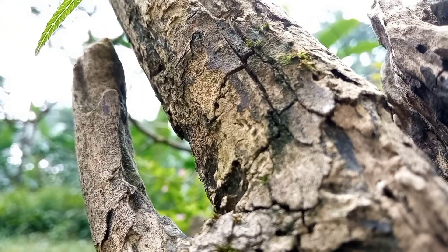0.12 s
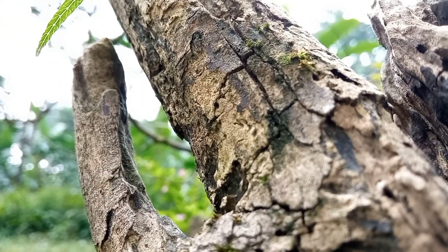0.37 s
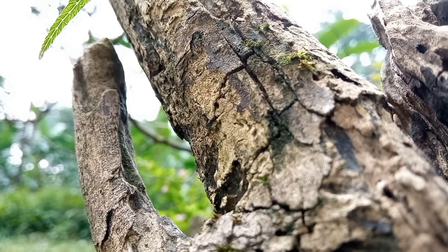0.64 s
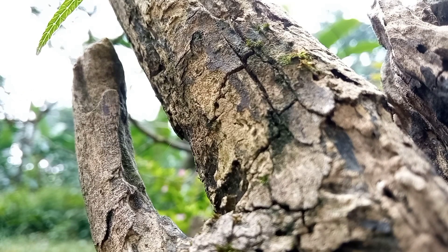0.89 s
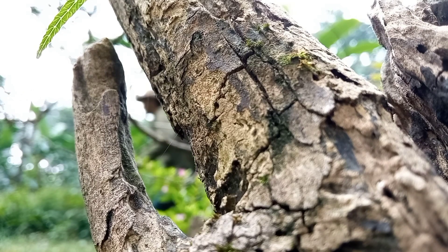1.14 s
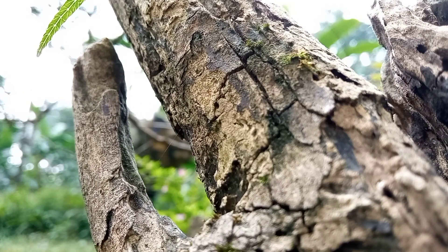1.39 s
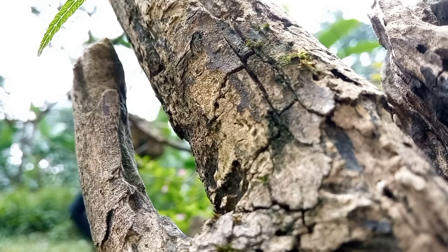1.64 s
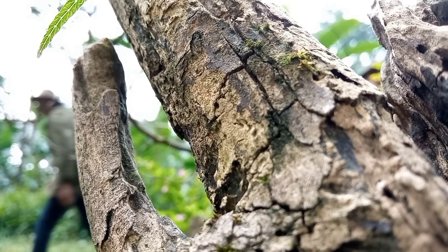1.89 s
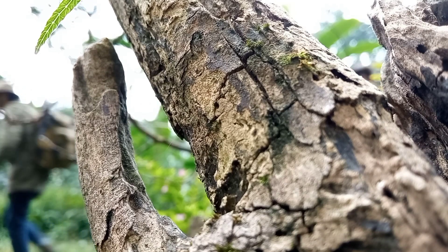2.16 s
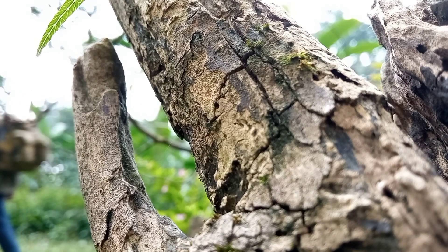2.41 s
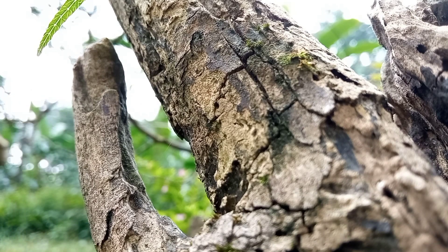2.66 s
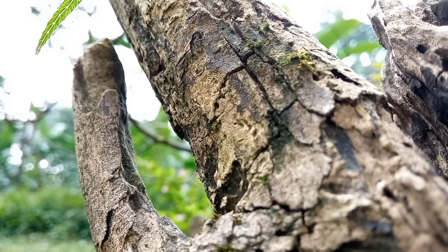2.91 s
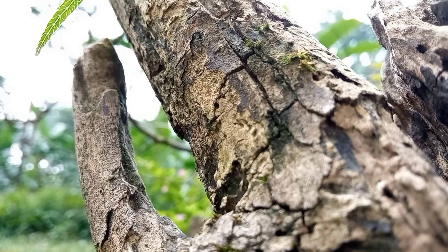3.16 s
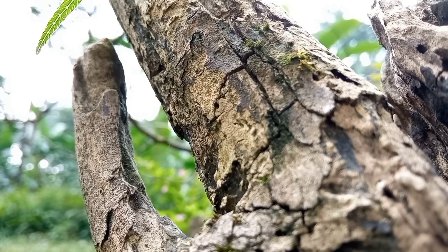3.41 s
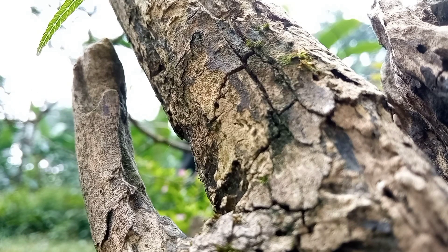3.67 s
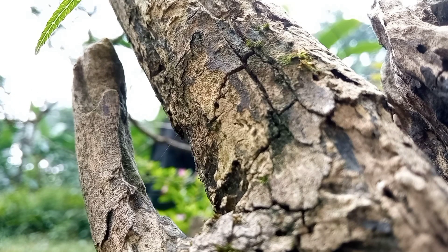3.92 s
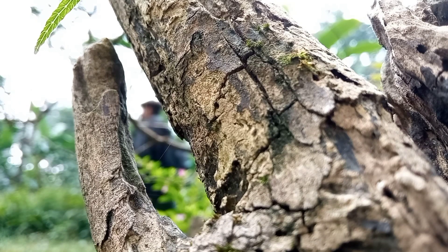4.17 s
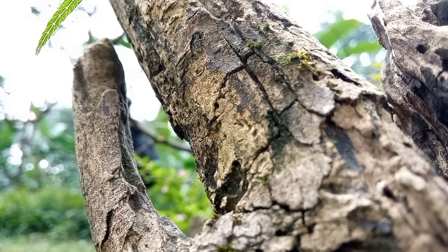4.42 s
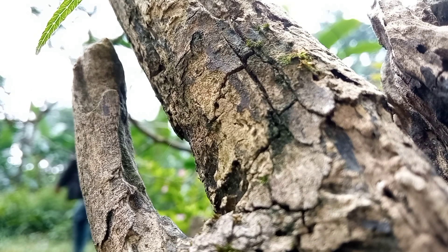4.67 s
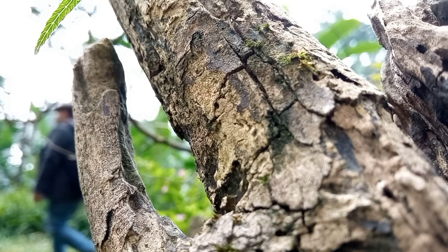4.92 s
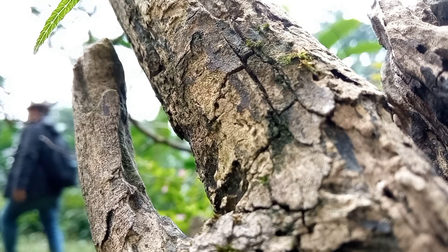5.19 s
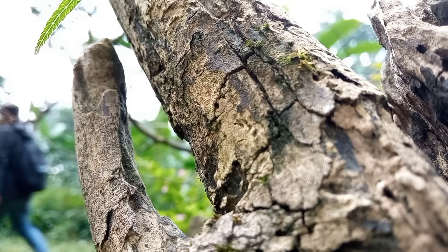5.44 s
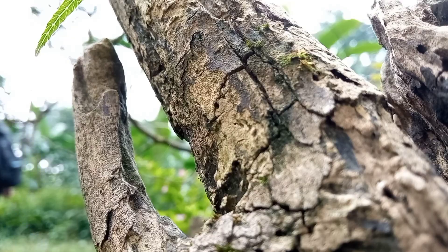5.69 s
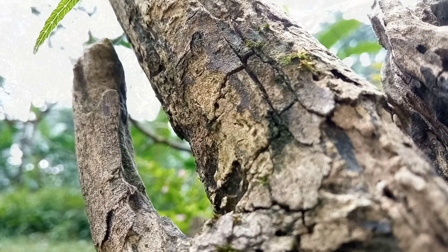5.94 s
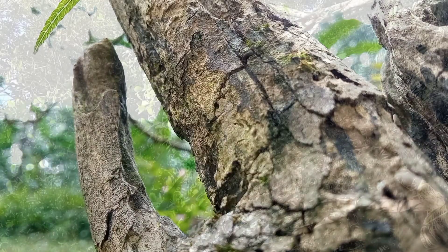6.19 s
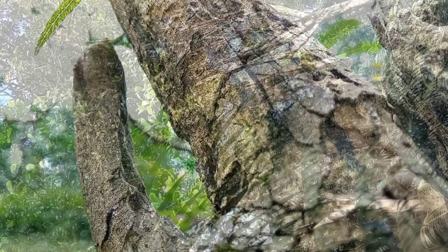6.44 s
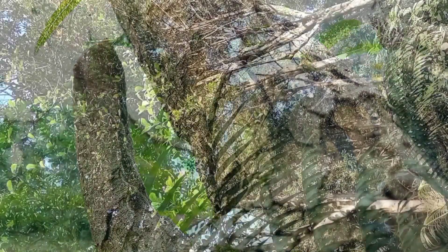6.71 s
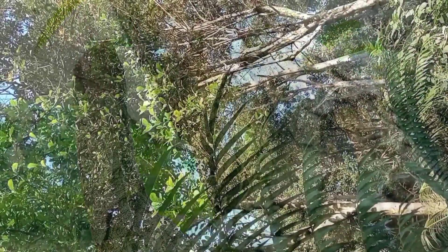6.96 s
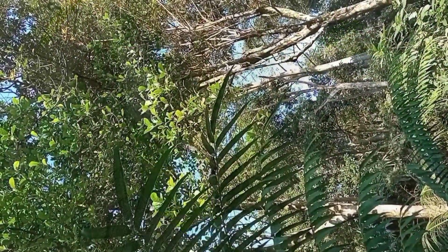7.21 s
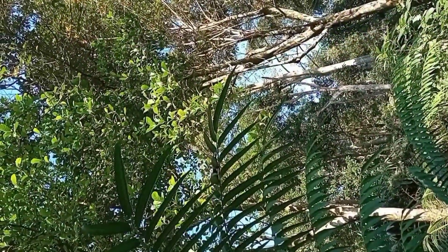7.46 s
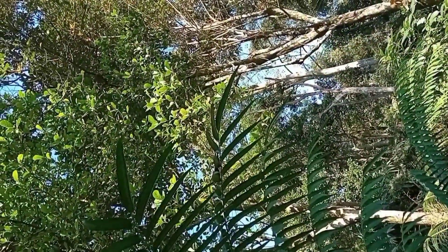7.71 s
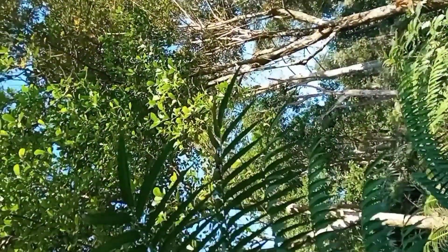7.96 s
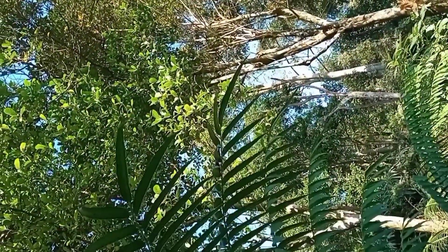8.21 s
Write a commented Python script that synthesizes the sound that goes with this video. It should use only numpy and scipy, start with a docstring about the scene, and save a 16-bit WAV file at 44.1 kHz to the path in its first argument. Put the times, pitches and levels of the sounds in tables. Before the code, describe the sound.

Shrill, throbbing cicadas fill a forest while footsteps swish through grass; a second, slightly lower cicada chorus joins, with reversed-sounding bird trills and hoarse calls.

```python
"""Two forest places, the second joining at 6.6 s and the first stopping at 7.4 s, over a lumpy low rumble.
The first: throbbing cicada click trains, steps as bursts of snaps in grass, far birds and a long hoot as
wavering tones, hollow knocks as decaying modes, and a close leafy branch as dense crackles.
The second, played backwards: lower cicadas, a trill whose echoes swell ahead of it, a hoarse caller made of
noise shifted up to a moving pitch, and a pop as a reversed decay. Both channels carry the same sound."""
import sys
import numpy as np
from scipy import signal
from scipy.fft import rfft, irfft, next_fast_len
from scipy.io import wavfile
from scipy.ndimage import uniform_filter1d

SR = 44100
rng = np.random.default_rng(int(sys.argv[2]) if len(sys.argv) > 2 else 0)


def to_wav(sig):
    """Store sig (one row per channel, or 1-D mono) as 16-bit WAV at the path in sys.argv[1].

    Samples outside -1..1 are clipped; the rate is SR.
    """
    pcm = np.clip(np.atleast_2d(sig), -1, 1) * 32767
    pcm = np.round(pcm).astype(np.int16)
    wavfile.write(sys.argv[1], SR, pcm.T)  # frames by channels


def makeup_ratio(level_db):
    """Linear amplitude ratio for a level in decibels (20 dB per factor of ten)."""
    decades = np.asarray(level_db, float) / 20
    return 10 ** decades


N = 367774  # length [samples]
FIRST_ENDS, SECOND_STARTS = 7.383, 6.628  # [s]


def evened(x):
    """Normalisation: scales a signal to rms 1."""
    return x / np.sqrt(np.mean(x ** 2) + 1e-20)


def read(points, hz):
    """Interpolation of a spectrum along a logarithmic frequency axis."""
    f, value = np.transpose(points)
    return np.interp(np.log(hz + 1), np.log(f + 1), value)


def curve(rows, order=1):
    """Linear interpolation of one table column at every sample."""
    rows = np.asarray(rows)
    return np.interp(np.arange(N) / SR, rows[:, 0], rows[:, order])


def add(mix, s, sound):
    """Superposition: sums a sound into the mix from time s."""
    part = mix[round(s * SR):][:len(sound)]
    part += sound[:len(part)]


def coloured(x, points, tilt_db=0):
    """Linear filtering by a spectrum, tilted about 900 Hz by tilt_db per octave."""
    size = next_fast_len(len(x))
    hz = np.fft.rfftfreq(size, 1 / SR)
    gain_db = read(points, hz) + tilt_db * np.log2((hz + 50) / 900)
    return irfft(rfft(x, size) * makeup_ratio(gain_db), size)[:len(x)]


def drift(top_hz):
    """Random-phase synthesis: twenty slow sines sum to a wandering curve of rms 1."""
    t = np.arange(0, N, 64) / SR
    slow = 0
    for f in np.geomspace(top_hz / 20, top_hz, 20):
        slow = slow + np.sin(2 * np.pi * (f * t + rng.random())) / np.sqrt(f)
    return np.interp(np.arange(N), np.arange(len(t)) * 64, evened(slow))


def echoes(t60):
    """Diffuse scattering among trunks: exponentially decaying noise of energy 1."""
    t = np.arange(round(.8 * SR)) / SR
    tail = rng.standard_normal(len(t)) * makeup_ratio(-60 * t / t60)
    return tail / np.linalg.norm(tail)


def note(db, hz, length):
    """Amplitude modulation: a soft sine, arched 1.9 % in pitch, flutters on its way through moving leaves."""
    u = np.arange(round(length * SR)) / (length * SR)
    slow = evened(uniform_filter1d(rng.standard_normal(len(u)), size=200))
    flutter = evened(1 + .5 * slow)
    pitch = hz * (1 + 0.019 * np.sin(np.pi * u))
    return makeup_ratio(db) * flutter * np.sin(np.pi * u) * np.sin(2 * np.pi * np.cumsum(pitch) / SR)


# Spectrum of each cicada chorus as heard, with gaps near 12-14 kHz:
# (frequency [Hz], relative level per hertz [dB])
FIRST_CHORUS = [(2060, -47.5), (3500, -39.5), (4440, -24), (4910, -10), (5130, -2.5), (5560, -5), (6030, 2),
                (6340, -5.5), (6960, -17.5), (8300, -30.5), (11100, -25), (11800, -26), (12400, -35),
                (13200, -39), (13700, -45), (15100, -27), (15600, -33)]
SECOND_CHORUS = [(2060, -46), (3500, -29), (3840, -27), (4700, -5.5), (5160, -6.5), (5590, -2), (6070, -13),
                 (7090, -29.5), (7790, -31.5), (8350, -29.5), (9820, -25), (12500, -49), (13700, -36),
                 (14900, -24), (15300, -19), (15600, -23)]
# Effort of each chorus, about which its level wanders: (time [s], level [dB])
FIRST_EFFORT = [(0.0, -27), (0.5, -27.5), (4.6, -28.5), (6.0, -27.5), (6.5, -28.5), (7.4, -28.5)]
SECOND_EFFORT = [(6.63, -31.5), (7.4, -32.5), (7.8, -31.5), (8.34, -32.5)]
# Bands of the three kinds of insect: (low edge [Hz], top edge [Hz])
INSECT_BANDS = [(100, 7800), (7800, 13200), (13200, 17000)]


def cicadas(spectrum, effort, click_hz, throb_hz, depths, wet, count=20):
    """Filtered impulse trains: buckling drums click in throbbing trains, scattered by leaves."""
    chorus = 0
    wet = np.clip(wet, 0, 1)  # share of power that is scattered
    hz = np.fft.rfftfreq(N, 1 / SR)
    for (low_hz, top_hz), depth in zip(INSECT_BANDS, depths):
        kind = np.zeros(N)
        for size_db, pace, throb, start in rng.standard_normal((count, 4)):
            beats = np.arange(2500) + .1 * rng.standard_normal(2500)  # jittered
            at = (abs(beats) * SR / (click_hz * (1 + .06 * pace))).astype(int)
            at = at[at < N]
            throb_phase = 2 * np.pi * throb_hz * (1 + .06 * throb) * at / SR + 3 * start
            pulse = 1 + depth * np.sin(throb_phase)
            clicks = np.zeros(N)
            clicks[at] = makeup_ratio(0.58 * size_db) * pulse * rng.standard_normal(len(at))
            scattered = signal.oaconvolve(clicks, echoes(t60=0.085)[:2500])[:N]
            kind += np.sqrt(1 - wet) * clicks + np.sqrt(wet) * scattered
        chorus = chorus + rfft(evened(kind)) * (hz >= low_hz) * (hz < top_hz)
    level = makeup_ratio(curve(effort) + 0.21 * drift(top_hz=8))
    return level * evened(coloured(irfft(chorus, N), spectrum))


# Background hiss and rumble of each place as heard, the second with a gap near 2.7 kHz:
# (frequency [Hz], relative level per hertz [dB])
FIRST_BACKGROUND = [(15, -49.5), (25, -44), (42, -14), (86, 0), (118, 2.5), (376, -14.5), (538, -15),
                    (854, -13.5), (1480, -23), (2340, -16.5), (3020, -22.5), (3570, -24), (3800, -24),
                    (4940, -33), (8360, -120)]
SECOND_BACKGROUND = [(15, -56), (25, -35), (70, 3), (156, -7.5), (247, -10), (393, -11.5), (561, -11.5),
                     (2250, -12), (2550, -15), (2750, -22), (2950, -17.5), (3800, -24), (4940, -47.5),
                     (8360, -120)]
# Uneven rise and fall of the bass, with some sudden jumps, before chance lumps are added:
# (time [s], relative level [dB])
BASS_LEVEL = [(0, 0.5), (1.95, -3.5), (2.05, 2.5), (2.7, 1.5), (3.1, 2.5), (3.9, 1), (4.9, 0.5),
              (5.45, -5.5), (5.55, 4), (6.1, -3), (6.8, 4.5), (7.05, -3), (7.4, 4), (8.0, -3), (8.34, 5.5)]


def background(points, db, patchy_db):
    """Random short-time spectra: hiss in drifting patches over a bass that rises and falls unevenly."""
    lump_db, lump_hz = 2, 50  # rms and fastest rate of the chance lumps
    frames, hz = N // 256 + 5, np.fft.rfftfreq(1024, 1 / SR)
    a, b, patches = rng.standard_normal((frames, 513, 3)).T
    patches = uniform_filter1d(patches, size=8, axis=0)
    patches = evened(uniform_filter1d(patches, size=14, axis=1))
    bass_db = curve(BASS_LEVEL) + lump_db * drift(lump_hz)
    bass_db = bass_db[np.minimum(np.arange(frames) * 256, N - 1)]
    bass = 1 / (1 + (hz[:, None] / 220) ** 4)  # share of the bass level at each frequency
    spectra = (a + 1j * b) * makeup_ratio(patchy_db * (1 - 0.48 * bass) * patches + bass * bass_db)
    sound = signal.istft(spectra, nperseg=1024, noverlap=768)[1][:N]
    return makeup_ratio(db) * evened(coloured(sound, points))


# Clearest short calls, before the echo blend: (time [s], level [dB], base pitch [Hz], length [s])
BIRD_CALLS = [(0.117, -50, 786, 0.054), (0.26, -51, 801, 0.087), (0.366, -48, 892, 0.039),
              (0.507, -47, 883, 0.032), (0.619, -49, 887, 0.046), (1.1987, -53, 2590, 0.042),
              (1.38, -46, 886, 0.067), (1.469, -54, 843, 0.046), (2.19, -57, 1780, 0.18),
              (2.6, -51, 678, 0.078), (2.6354, -50, 2590, 0.0445), (2.73, -56, 713, 0.13),
              (2.825, -51, 2680, 0.0324), (2.9596, -48, 2995, 0.04), (3.163, -50, 2440, 0.0345),
              (3.469, -49, 900, 0.054), (3.6855, -54, 2590, 0.045), (3.8277, -50, 2580, 0.035),
              (4.449, -52.5, 1138, 0.093), (4.675, -49, 1095, 0.061), (5.189, -48.5, 900, 0.07),
              (5.32, -55, 1740, 0.036), (5.363, -52, 2564, 0.0335), (5.488, -51, 2870, 0.04),
              (5.54, -49, 1730, 0.06), (5.658, -51, 2540, 0.026), (5.832, -53, 2260, 0.028),
              (6.079, -47, 922, 0.051)]
# The long hoot, before the echo blend: (start [s], length [s], mean level [dB], top of the pitch arch [Hz])
LONG_HOOT = (1.92, 0.65, -53, 709)


def far_birds(count=24):
    """Reverberant blurring of distant tones: calls, faint chance chirps and one long wavering hoot."""
    out = np.zeros(N)
    for s, *call in BIRD_CALLS:
        add(out, s, note(*call))
    for when, (size, pitch) in zip(rng.random(count), rng.standard_normal((count, 2))):
        add(out, when * FIRST_ENDS, note(db=-57.5 + 2.7 * size, hz=2420 + 148 * pitch, length=0.039))
    s, length, db, top_hz = LONG_HOOT
    rise_s, fall_s, arch_hz = 0.076, .03, 22
    t = np.arange(0, length, 1 / SR)
    shape = np.minimum(t / rise_s, 1) ** 2 * np.minimum((length - t) / fall_s, 1)
    hz = top_hz - arch_hz * (2 * t / length - 1) ** 2 + 5 * drift(top_hz=39.8)[:len(t)]
    level = np.sqrt(2) * makeup_ratio(db + 3.7 * drift(top_hz=160)[:len(t)])
    add(out, s, level * shape * np.sin(2 * np.pi * np.cumsum(hz) / SR))
    return 0.65 * out + 0.5 * signal.oaconvolve(out, echoes(t60=0.51))[:N]


# Dull knocks on something hollow close by: (time [s], strength [dB])
BLOWS = [(0.299, -35.5), (3.242, -34), (7.242, -30.5), (7.296, -25.5), (7.304, -25), (7.315, -25),
         (7.324, -29.5), (7.337, -25.5), (7.351, -31)]
# Modes of the hollow thing: (frequency [Hz], relative level [dB], time to decay by 60 dB [s])
HOLLOW_MODES = [(132, -1.5, 0.065), (247, -2.5, 0.074), (324, -3, 0.0625), (472.5, -15.5, 0.21)]


def knocks():
    """Modal decay: each blow rings the damped modes of a hollow body."""
    out, t = np.zeros(N), np.arange(9000) / SR
    for s, db in BLOWS:
        for hz, mode_db, t60 in HOLLOW_MODES:
            level = makeup_ratio(db + mode_db - 60 * t / t60)
            onset = 1 - np.exp(-t / 0.009)
            add(out, s, level * onset * np.sin(2 * np.pi * hz * t))
    return out


# Steps in grass: (time [s], strength [dB], brightness [dB per octave])
FOOTFALLS = [(0.598, -47.5, 2), (0.996, -41.5, -0.5), (1.298, -47, 5), (1.545, -40.5, 0.8),
             (1.933, -40, -0.5), (2.402, -41.5, 4.5), (2.473, -34, 2), (2.768, -49, 0), (3.037, -35, -0.5),
             (3.232, -38.5, -2), (3.618, -37, -0.5), (3.794, -45, 3), (4.236, -38, 2), (4.79, -36.5, 2.5),
             (5.337, -39.5, 3.5), (5.538, -37, 1.5), (5.95, -39.5, 2), (6.107, -41.5, 5),
             (6.658, -37.5, 0.8), (7.271, -33.5, 2)]
# Colour of the grass: (frequency [Hz], relative level per hertz [dB])
GRASS_COLOUR = [(150, -14), (400, -2), (900, -0.3), (1600, -12), (3000, -14), (7000, -8.5), (15000, -40)]
# Twigs: (time [s], level [dB], base pitch [Hz], length [s])
TWIGS = [(4.964, -47, 1600, .008), (5.996, -43, 1110, 0.0089)]


def steps():
    """Impulsive noise: blades and twigs snap in a clumped swish under each foot."""
    swish_s, lead_s = 0.077, .012  # time scale of a swish; it starts just before the foot lands
    out, t = np.zeros(N), np.arange(round(.35 * SR)) / SR
    for s, db, tilt_db in FOOTFALLS:
        snap_db = 2.8 * np.minimum(rng.exponential(1, len(t)), 5)
        snaps = evened(rng.standard_normal(len(t)) * makeup_ratio(snap_db))
        clumps = evened(uniform_filter1d(rng.standard_normal(len(t)), size=350))
        snaps *= makeup_ratio(2.1 * clumps)
        u = t / swish_s
        swish = 3 * u * np.exp(-1.4 * u ** 2)
        add(out, s - lead_s, makeup_ratio(db) * coloured(snaps, GRASS_COLOUR, np.clip(tilt_db, -4, 5)) * swish)
    for s, *tick in TWIGS:
        add(out, s, note(*tick))
    return out


# The pop: (time of its sharp end [s], strength [dB], frequency [Hz])
REVERSED_POP = (6.7372, -20, 980)


def pop():
    """Time reversal of a damped oscillation: a hollow click swells for a few cycles and stops."""
    out, t = np.zeros(N), np.arange(600) / SR
    s, db, hz = REVERSED_POP
    envelope = 1.76 * (1 - np.exp(-t / 0.00069)) * np.exp(-t / 0.0017)
    ring = makeup_ratio(db) * envelope * np.sin(2 * np.pi * hz * t)
    add(out, s - len(t) / SR, ring[::-1])
    return out


# Two-syllable calls: (time of the sharp end [s], relative level [dB])
CALLS = [(7.04, -3), (7.69, 1.5), (8.31, 0.5)]
# Low then high syllable: (peak time from the sharp end [s], pitch [Hz], level [dB], swell [dB/s], fade [dB/s])
CALL_SYLLABLES = [(-.23, 3000, -51.5, 30, 110), (-.03, 3222, -51, 70, 500)]


def hoarse_caller():
    """Quadrature modulation: noise shifted to a fuzzy band near 3 kHz, a low then a high syllable."""
    slide_s = .07  # pitch slide between syllables
    low_at, low_hz = CALL_SYLLABLES[0][:2]
    high_hz = CALL_SYLLABLES[1][1]
    t, level, hz = np.arange(N) / SR, np.zeros(N), np.full(N, float(low_hz))
    for end, call_db in CALLS:
        for before, _, db, swell_db, fade_db in CALL_SYLLABLES:
            late = t - end - before
            shape_db = np.minimum(swell_db * late, -fade_db * late)
            level = np.maximum(level, makeup_ratio(call_db + db + shape_db))
        high = np.clip((t - end - low_at) / slide_s - 1, 0, 1) * (t < end + .03)
        hz = hz + high * (high_hz - low_hz)
    fuzz = signal.lfilter(*signal.butter(3, 100, fs=SR), rng.standard_normal((2, N)))
    turn = 2 * np.pi * np.cumsum(hz) / SR
    shifted = evened(fuzz[0] * np.cos(turn) + fuzz[1] * np.sin(turn))
    return level * makeup_ratio(1.8 * drift(top_hz=79.9)) * shifted


# Trill phrases, before the echo blend: (time [s], level [dB])
TRILL_PHRASES = [(7.101, -33), (7.772, -33), (8.444, -33)]
# Notes of a phrase: (time after the phrase mark [s], lowest pitch [Hz])
TRILL_NOTES = [(.001, 1728), (0.06, 1546), (.15, 1500), (.213, 1447)]
# Course of one note: (time [s], share of the climb to the top pitch [0-1], relative level [dB])
TRILL_SHAPE = [(-.012, 0.104, -11), (-.004, 0.016, -5.5), (.006, 0.248, 1), (0.012, .8, 0),
               (0.018, .93, -4), (.025, 0.975, -9), (0.031, 1.0, -15)]


def trilling_bird():
    """Time-reversed reverberation: notes dwell low and whip up, the forest echo coming ahead of them."""
    top_hz = 2435
    out = np.zeros(N + SR)
    s, climb, shape_db = np.transpose(TRILL_SHAPE)
    t = np.arange(s[0], s[-1], 1 / SR)
    for mark, phrase_db in TRILL_PHRASES:
        for after, low_hz in TRILL_NOTES:
            pitch = low_hz + (top_hz - low_hz) * np.interp(t, s, climb)
            level = makeup_ratio(phrase_db + np.interp(t, s, shape_db)) * signal.windows.tukey(len(t), .2)
            add(out, mark + after + s[0], level * np.sin(2 * np.pi * np.cumsum(pitch) / SR))
    paths = makeup_ratio(-0.3) * echoes(t60=0.8) + makeup_ratio(-6.5) * echoes(t60=0.098)  # far trunks and near branches
    paths[round(.009 * SR)] += .4  # one strong bounce
    echoed = signal.oaconvolve(out[::-1], paths)[:len(out)][::-1]
    return (makeup_ratio(-4.0) * out + echoed)[:N]


# A leafy branch brushing past close by: (time [s], level [dB], length [s])
BRANCH = (7.2, -36, 0.08)
# Colour of its leaves: (frequency [Hz], relative level per hertz [dB])
LEAF_COLOUR = [(200, -5), (700, -10), (1200, -1.5), (3000, -6), (8000, -5), (12000, -11.5), (15500, -18)]


def brush():
    """Friction noise: many small leaf contacts make a short bright swish of dense crackles."""
    out = np.zeros(N)
    s, db, length = BRANCH
    u = np.arange(round(length * SR)) / (length * SR)
    crackle_db = 2.5 * np.minimum(rng.exponential(1, len(u)), 5)
    crackles = rng.standard_normal(len(u)) * makeup_ratio(crackle_db)
    swish = np.sin(np.pi * u ** 0.68) * np.sqrt(2)
    add(out, s, makeup_ratio(db) * evened(coloured(crackles, LEAF_COLOUR)) * swish)
    return out


def scene():
    """Superposition of the two places, which overlap and are switched by ramps of a few milliseconds."""
    t = np.arange(N) / SR
    first = cicadas(FIRST_CHORUS, FIRST_EFFORT, click_hz=190.27, throb_hz=21.08, depths=(.45, .15, .3), wet=0.89)
    first += background(FIRST_BACKGROUND, db=-51, patchy_db=3.5)
    first += far_birds() + knocks() + steps() + brush()
    second = cicadas(SECOND_CHORUS, SECOND_EFFORT, click_hz=164.9, throb_hz=21.5, depths=(.2, .2, .8), wet=1.0)
    second += background(SECOND_BACKGROUND, db=-52, patchy_db=2.0)
    second += pop() + hoarse_caller() + trilling_bird()
    first_gate = np.clip((FIRST_ENDS - t) / 0.0044, 0, 1)
    second_gate = np.clip((t - SECOND_STARTS) / 0.0031, 0, 1)
    mix = first * first_gate + second * second_gate
    return np.array([mix, mix])


def roll_off(x):
    """The treble ends steeply here."""
    return signal.sosfilt(signal.butter(12, 17100, fs=SR, output="sos"), x)


def record(dry):
    """Band limitation: a steep linear-phase low-pass at 15.72 kHz."""
    edge = signal.firwin(1023, 15720, window=("kaiser", 10), fs=SR)
    limited = signal.oaconvolve(dry, edge[None], "same")
    return roll_off(limited)


dry = scene()
out = record(dry)
to_wav(out)
```